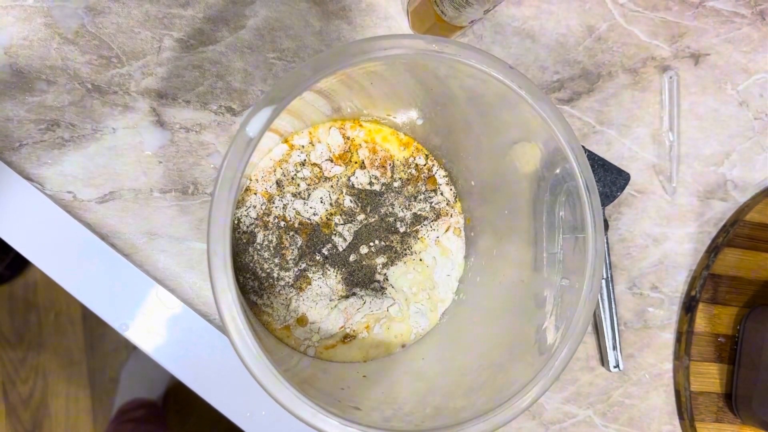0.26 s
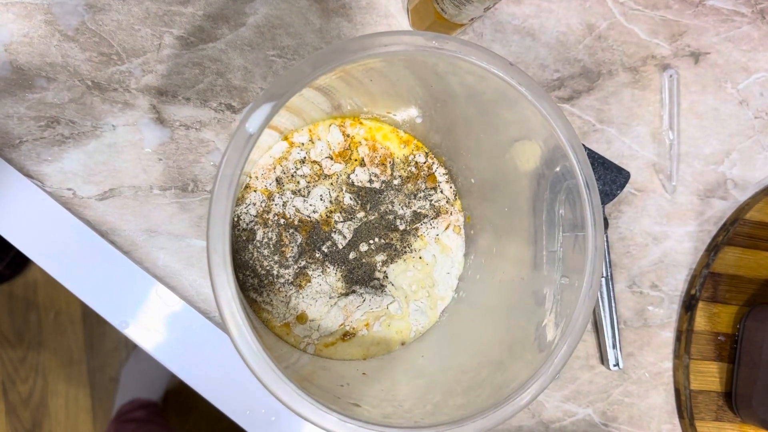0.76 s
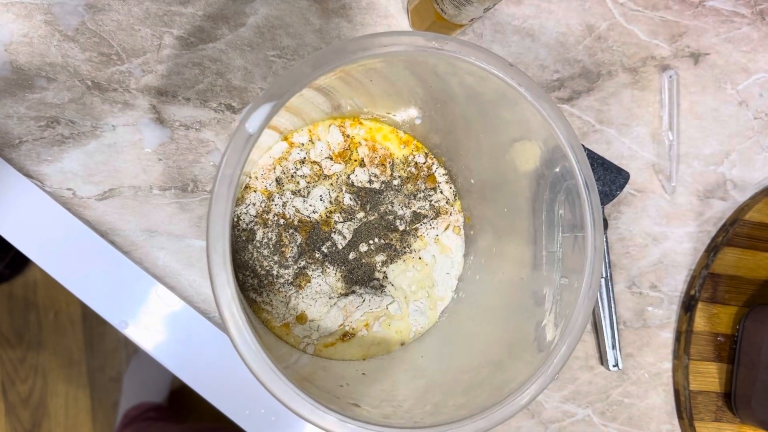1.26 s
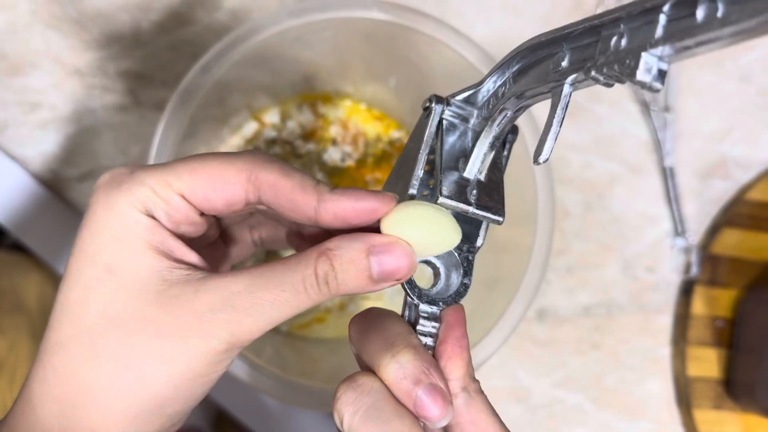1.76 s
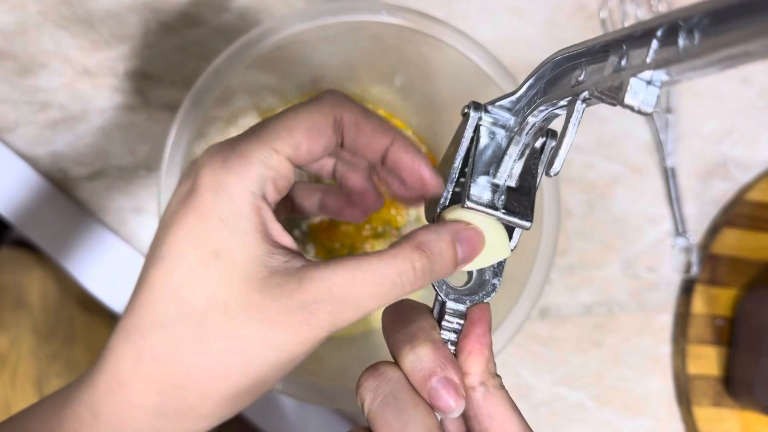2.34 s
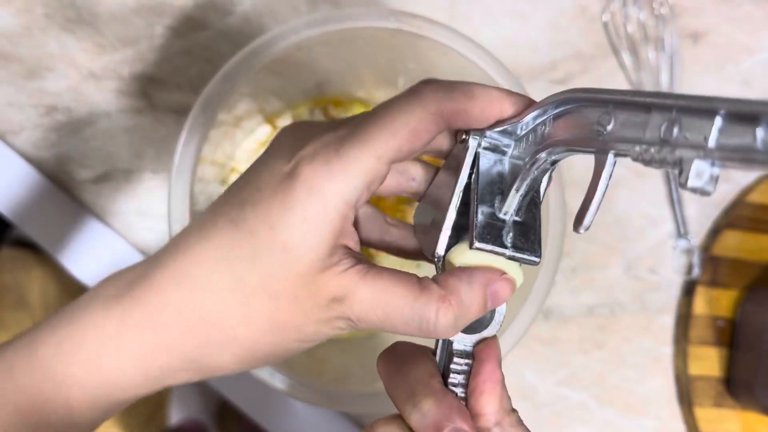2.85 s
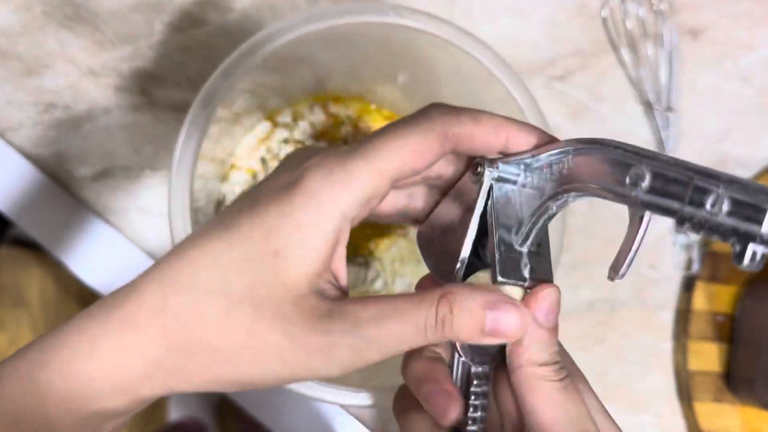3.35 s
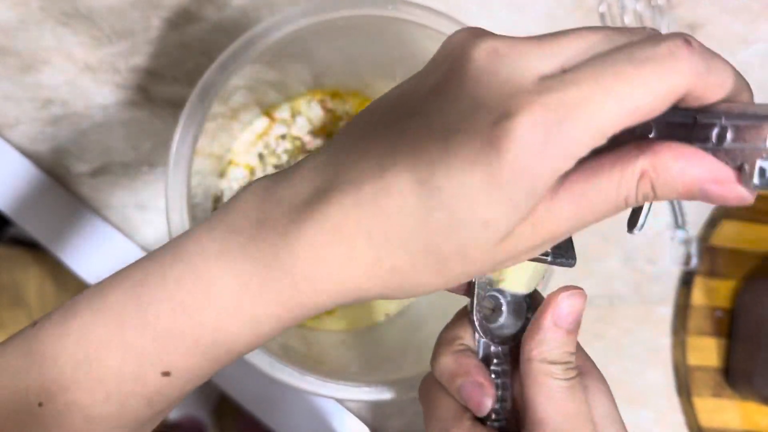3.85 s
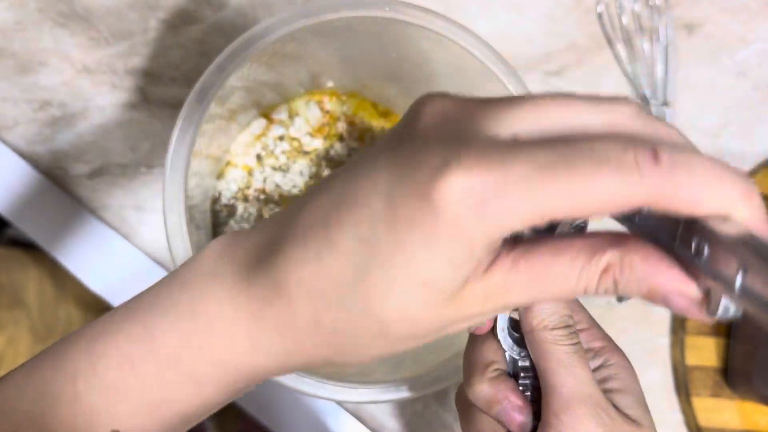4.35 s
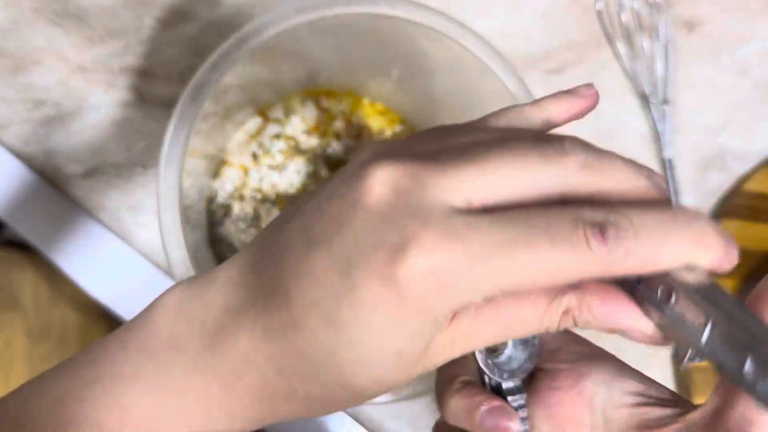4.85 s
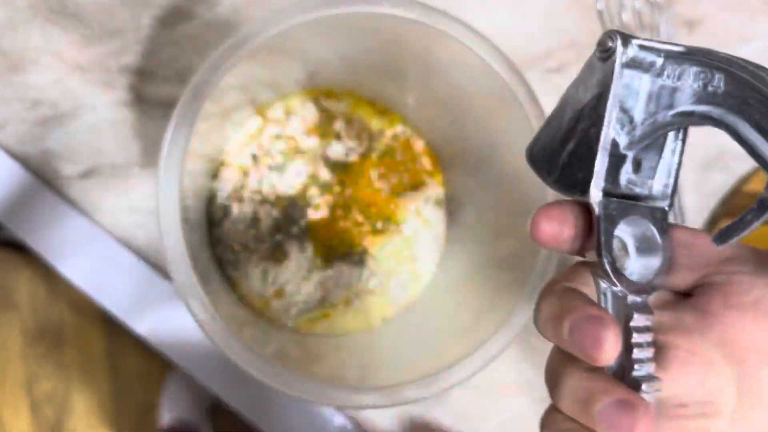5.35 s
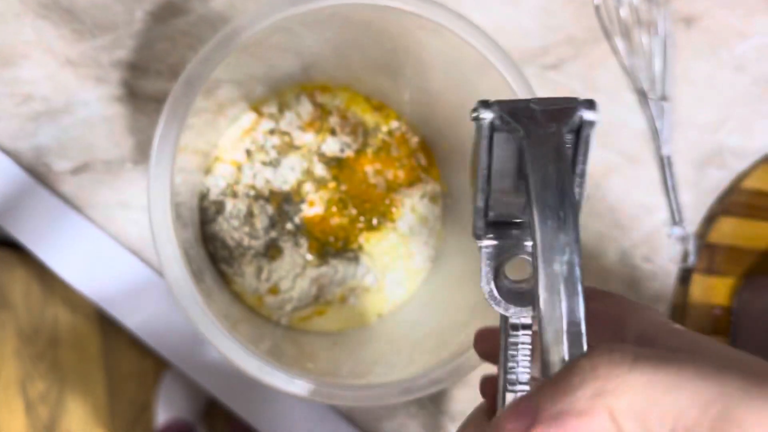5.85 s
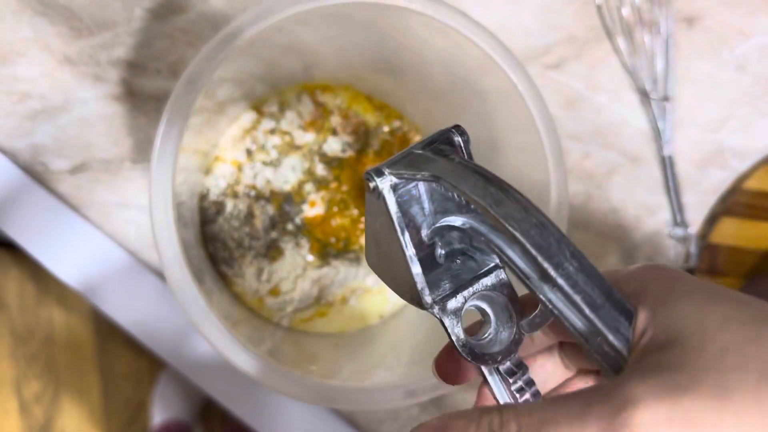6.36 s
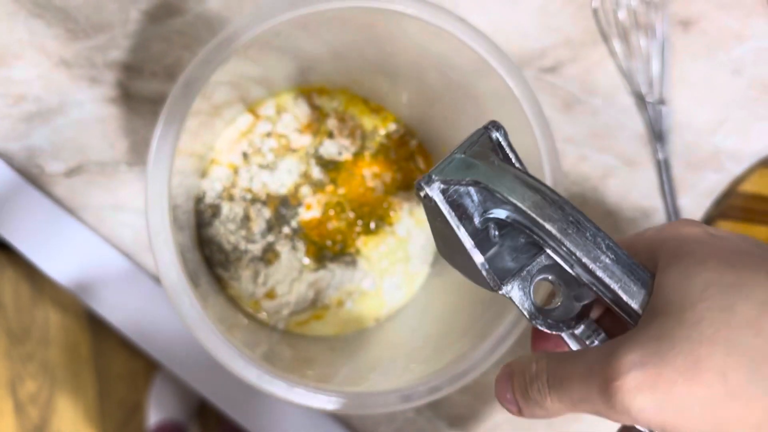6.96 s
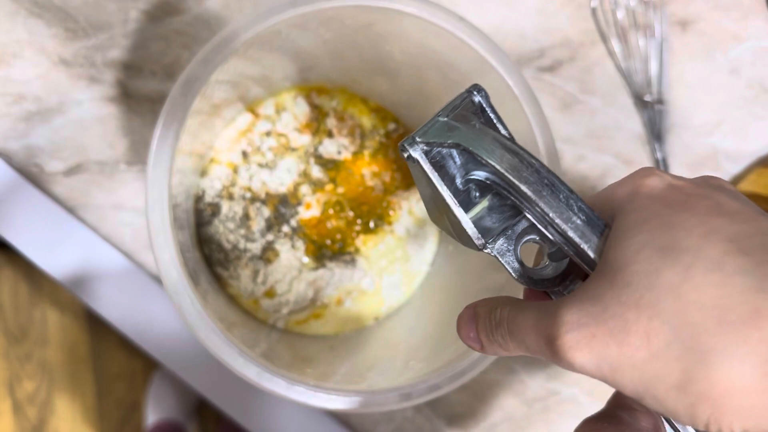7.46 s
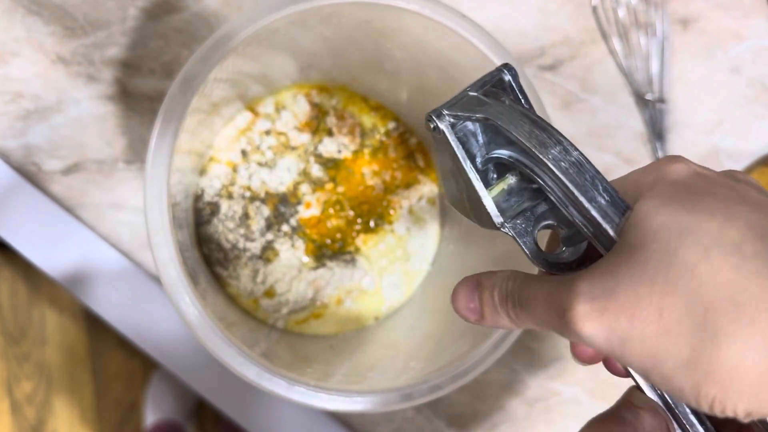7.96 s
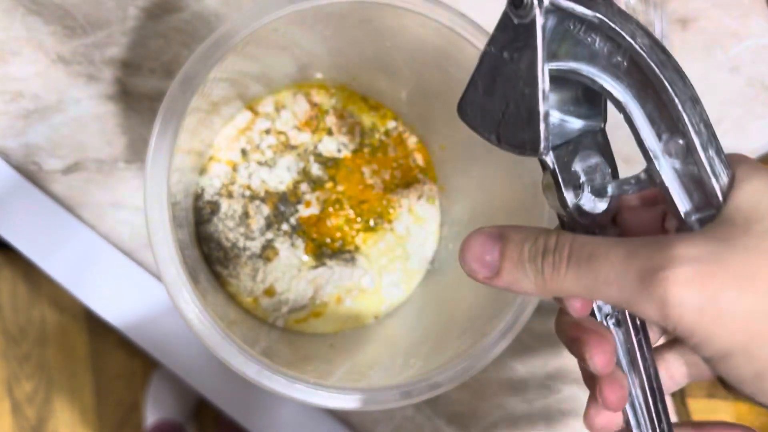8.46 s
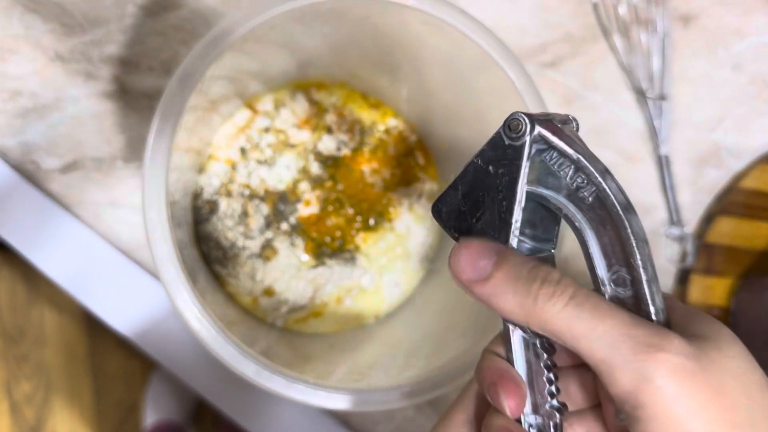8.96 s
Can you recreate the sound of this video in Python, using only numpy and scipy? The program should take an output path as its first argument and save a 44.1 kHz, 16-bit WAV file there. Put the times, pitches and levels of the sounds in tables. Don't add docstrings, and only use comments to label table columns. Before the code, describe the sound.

Close kitchen handling: hollow plastic knocks, near-silent finger touches, a sharp metal press slam, plunger knocks, then bright garlic-skin crackling over faint fridge hum.

```python
import sys
import numpy as np
from scipy import signal
from scipy.fft import rfft, irfft
from scipy.io import wavfile
from scipy.ndimage import uniform_filter1d

SR = 44100
rng = np.random.default_rng(int(sys.argv[2]) if len(sys.argv) > 2 else 0)


def voltage_ratio(level):
    return 10 ** (np.asarray(level, float) / 20)


def store_pcm(level_fs):
    pcm = np.round(np.clip(level_fs, -1, 1) * 32767).astype(np.int16)
    wavfile.write(sys.argv[1], SR, np.atleast_2d(pcm).T)


N = 406161
TIME = np.arange(N) / SR
CUT_S = 1.405
BOWL_NEAR = (TIME < CUT_S) | (TIME > 8)


def evened(x):
    return x / np.sqrt(np.mean(x ** 2) + 1e-20)


def read(points, hz):
    f, value = np.transpose(points)
    return np.interp(np.log(hz + 1), np.log(f + 1), value)


def add(mix, s, sound):
    part = mix[round(s * SR):][:len(sound)]
    part += sound[:len(part)]


def played(rows):
    s, *columns = np.transpose(rows)
    t = np.arange(max(s[0], 0), s[-1], 1 / SR)
    return t[0], [np.interp(t, s, c) for c in columns]


def resonate(x, hz, width):
    turn = np.exp(2j * np.pi * np.cumsum(hz * np.ones(len(x))) / SR)
    r = np.exp(-np.pi * width / SR)
    return 2 * (turn * signal.lfilter([1 - r], [1, -r], x / turn)).real


def band(x, lo_hz, hi_hz):
    sos = signal.butter(3, [lo_hz, min(hi_hz, SR / 2.2)], "band", fs=SR, output="sos")
    return evened(signal.sosfilt(sos, x))


def dipped(x, hz, width, share):
    b, a = signal.iirpeak(hz, hz / width, SR)
    return x - np.clip(share, 0, 1) * signal.lfilter(b, a, x)


def gritty(count, per_s, spread_db, share):
    hiss, chance, size = rng.standard_normal(count), rng.random(count), rng.exponential(1, count)
    slips = np.sign(hiss) * (chance < per_s / SR) * voltage_ratio(spread_db * np.minimum(size, 4))
    return hiss + share * evened(slips)


def body(x, peaks, widen):
    out = 0
    for hz, db, w in [(hz, db, w * widen) for hz, w, db in peaks]:
        out = out + voltage_ratio(db) * evened(resonate(resonate(x, hz, w), hz, 4 * w))
    return evened(out)


def blow(peak_db, hz, bass_db, treble_db, contact_ms, edges_hz, lift_db, tail_db, peaks, ring_db):
    t, f = np.arange(4096) / SR, np.fft.rfftfreq(8192, 1 / SR)
    u = 1000 * t / max(contact_ms, .2)
    contact = (1 - np.exp(-9 * u)) * np.exp(-.75 * u)
    tail = voltage_ratio(tail_db - 1.677 * u) * np.minimum(u, 1)
    drive = gritty(len(t), 2200, 3.0, 0.8) * (contact + tail)
    drive[4] += 8.0
    levels_db = [bass_db - 22.0, bass_db, 0, 0, treble_db, treble_db - 12.5]
    colour = voltage_ratio(read(list(zip(edges_hz, levels_db)), f))
    colour = colour + voltage_ratio(lift_db) / (1 + ((f - hz) / (0.14 * hz)) ** 2)
    folded = irfft(np.log(colour))[:4096] * np.append(1, np.full(4095, 2))
    crack = irfft(rfft(drive, 8192) * np.exp(rfft(folded, 8192)))
    crack = np.roll(crack, 44)
    ring = body(np.append(drive, 0 * t), peaks, 0.79)
    crack = crack + voltage_ratio(ring_db) * np.sqrt(np.mean(crack ** 2)) * ring
    crack = crack[:6000] * np.minimum(np.arange(6000, 0, -1) / 1000, 1)
    return voltage_ratio(peak_db) * crack / abs(crack).max()


def burst(peak_s, rise_s, peak_db, fall_db_per_s):
    start = max(peak_s - rise_s, 0)
    t = np.arange(start, peak_s + min(48 / fall_db_per_s, .5), 1 / SR) - peak_s
    climb_db = 33 * np.maximum(-t / rise_s, 0)
    return start, voltage_ratio(peak_db - climb_db - fall_db_per_s * np.maximum(t, 0))


def struck(modes, hits):
    out, t = np.zeros(N), np.arange(SR // 4) / SR
    ring = 0
    for k, (hz, db, t60) in enumerate(modes):
        ring = ring + (-1) ** k * voltage_ratio(db - 60 * t / t60) * np.sin(2 * np.pi * hz * t)
    for s, db in hits:
        add(out, s, voltage_ratio(db) * ring * np.minimum(t / 0.0011, 1))
    return out


# f/Hz, level/dB per Hz
AIR_SPECTRUM = [(20, -64), (70, -8), (420, -19), (600, -29.5), (1100, -34), (3800, -27.5), (7500, -41),
                (16000, -57)]


def room_air():
    hz = np.fft.rfftfreq(2048, 1 / SR)
    a, b, patches = rng.standard_normal((N // 512 + 6, len(hz), 3)).T
    patches = evened(uniform_filter1d(uniform_filter1d(patches, 20, 0), 8, 1))
    depth_db = (1.5 + 1.0 * (hz < 260))[:, None]
    gain = voltage_ratio(read(AIR_SPECTRUM, hz)[:, None] + depth_db * patches)
    air = signal.istft((a + 1j * b) * gain, nperseg=2048, noverlap=1536)[1][:N]
    return voltage_ratio(-68.5) * evened(air)


# f/Hz, level/dB, start phase/turns
FRIDGE_PARTIALS = [(76.0, -78, 0), (98.39, -72, 0), (99.97, -76, .1), (94.57, -85, 0), (141.9, -85, 0),
                   (304.89, -74, 0), (406.5, -76, 0), (508.15, -92, 0)]


def fridge():
    return sum(voltage_ratio(db + 3) * np.sin(2 * np.pi * (f * TIME + turns)) for f, db, turns in FRIDGE_PARTIALS)


def whine():
    hz, width_hz, pulses_per_s = 6104, 259, 63
    pulse = np.maximum(np.sin(2 * np.pi * pulses_per_s * TIME) + .2, 0)
    drive = (rng.standard_normal(N) + 1.5 * np.sin(2 * np.pi * hz * TIME)) * pulse
    tone = evened(resonate(resonate(drive, hz, width_hz), hz, width_hz))
    octave = evened(tone ** 2 - uniform_filter1d(tone ** 2, size=21))
    return voltage_ratio(-85) * (tone + voltage_ratio(-13) * octave)


# f/Hz, t60/s
ROOM_DECAY = [(300, 0.6), (1500, 0.44), (4000, 0.39), (12000, 0.31)]


def kitchen(x):
    taps = np.zeros(SR // 2)
    at = np.arange(200, len(taps) - 20, 20)
    taps[at + rng.integers(0, 20, len(at))] = rng.choice([-1., 1.], len(at))
    hz, t, z = signal.stft(taps, SR, nperseg=256)
    tail = signal.istft(z * voltage_ratio(-60 * t / read(ROOM_DECAY, hz)[:, None]), SR, nperseg=256)[1]
    return signal.fftconvolve(x, tail / np.linalg.norm(tail))[:N]


# f/Hz, level/dB, t60/s
SPOON_MODES = [(4663, -22, 0.89), (5300, -2.5, 0.18), (6580, -2.5, 0.22), (6334, -45, 5.06),
               (11610, -10, 0.17)]


def spoon():
    out = 0
    for hz, db, t60 in SPOON_MODES:
        out = out + voltage_ratio(-55.5 + db - 60 * TIME / t60) * np.sin(2 * np.pi * hz * TIME)
    return out


# t/s, f/Hz, level/dB
CREAK_GLIDE = [(7.97, 990, -94), (8.01, 853, -89), (8.05, 709, -75), (8.126, 648, -80), (8.14, 634, -82),
               (8.16, 620, -90)]


def creak():
    out = np.zeros(N)
    s, (hz, db) = played(CREAK_GLIDE)
    drive = rng.standard_normal(len(hz))
    tone = evened(resonate(resonate(drive, hz, 60), hz, 80))
    tone = tone + 1.47 * evened(resonate(resonate(drive, hz / 2, 30), hz / 2, 50))
    add(out, s, voltage_ratio(db + 10.5) * tone * signal.windows.tukey(len(hz), .2))
    return out


# t/s, length/s, level/dB, low f/Hz, high f/Hz
COUNTER_BUMPS = [(0, 0.049, -41.5, 60, 199), (0.943, 0.23, -46, 206, 616), (1.675, 0.073, -54.5, 98, 281),
                 (4.902, 0.38, -57, 125, 172), (6.208, 0.045, -41.5, 520, 1340),
                 (6.267, 0.098, -53.5, 252, 1300), (6.71, 0.24, -60, 258, 574),
                 (8.311, 0.16, -51, 201.7, 436), (8.365, 0.14, -50.5, 184, 412),
                 (8.777, 0.17, -67, 398, 784)]


def bumps():
    out, t = np.zeros(N), np.arange(SR // 3) / SR
    for s, length, db, lo_hz, hi_hz in COUNTER_BUMPS:
        u = 5 * t / length
        add(out, s, voltage_ratio(db) * band(rng.standard_normal(len(t)), lo_hz, hi_hz) * np.sqrt(u) * np.exp(-u))
    return out


# t/s, f/Hz, level/dB, t60/s
RINGING_PARTS = [(3.623, 1743, -41, 0.05), (3.623, 4280, -50, 0.071), (3.623, 10800, -61, 0.07),
                 (3.925, 11740, -68, 0.075), (3.965, 3080, -76, 0.44), (4.883, 1602, -43, 0.07),
                 (4.883, 10800, -43.5, 0.13), (4.883, 7900, -37, 0.092), (4.882, 3210, -28.5, 0.067),
                 (5.51, 1796, -58, 0.055), (6.037, 1593, -57.5, 0.13), (6.266, 1900, -26, 0.019),
                 (7.791, 11460, -34, 0.04), (8.359, 1650, -60.5, 0.084), (8.359, 4400, -60, 0.078),
                 (8.79, 3720, -70.5, 0.58), (8.8, 7060, -69, 0.46), (4.125, 3070, -71, 0.19),
                 (4.11, 4400, -72.5, 0.26), (5.088, 4500, -67, 0.11), (5.235, 2264, -72, .4),
                 (1.306, 2125, -67, 1.4), (.955, 1090, -46, 0.28), (1.328, 3470, -72.5, 2.5)]


def ringing():
    out, t = np.zeros(N), np.arange(SR // 3) / SR
    for s, hz, db, t60 in RINGING_PARTS:
        cluster = body(rng.standard_normal(len(t)), [(hz, 2.5 * np.sqrt(hz), 0)], 0.91)
        same_scene = (s + t < CUT_S) | (s > CUT_S)
        add(out, s, voltage_ratio(db + 3.0 - 60 * t / t60) * cluster * np.minimum(t / 0.00047, 1) * same_scene)
    return out


# t/s, f/Hz, level/dB, t60/s
FAINT_PINGS = [(.235, 7000, -67, 0.0086), (.332, 1025, -56.5, 0.17), (.366, 1010, -32, 0.084),
               (.372, 2980, -44, .03), (.465, 1200, -54, .06), (.51, 1050, -58, .08),
               (.96, 3700, -51, 0.18), (4.547, 5950, -51, 0.089), (6.055, 7900, -50, 0.043),
               (6.055, 2720, -51, .04), (6.055, 11000, -44, 0.056), (7.254, 11500, -36, .012),
               (7.276, 11300, -24.5, .012), (7.791, 11330, -15, 0.014), (7.415, 10700, -33.5, 0.032),
               (1.304, 5500, -62, .03), (3.623, 7070, -50, .04), (3.924, 8500, -51, .02),
               (3.925, 6100, -59, .04), (4.047, 3300, -51, .02), (4.408, 3660, -51, .03),
               (4.062, 2970, -45, 0.028), (7.253, 7200, -33, .012), (7.6143, 9500, -38, .01),
               (7.649, 1740, -44, 0.022), (7.666, 1780, -45, 0.018), (7.699, 1860, -41, 0.017),
               (7.716, 1770, -41, .02), (7.8385, 3570, -49, .012), (7.878, 3300, -49, 0.011),
               (7.964, 1206, -63.5, 0.025), (0, 529, -55, 0.15), (0, 758, -59, 0.33), (0, 2460, -56, .08),
               (.004, 435, -60, .25), (1.293, 2000, -60, .04), (1.995, 6090, -68.5, .15),
               (1.995, 10000, -83, .12), (2.19, 10050, -80, .06), (2.192, 6000, -68, .12),
               (2.191, 2710, -60, 0.031), (2.443, 10200, -76, .05), (6.222, 5350, -38, .07)]


def pings():
    return sum(struck([(hz, 0, t60)], [(s, db)]) for s, hz, db, t60 in FAINT_PINGS)


# f/Hz, width/Hz, level/dB
BOWL_PEAKS = [(520, 110, -5), (876, 262, 3.5), (1063, 56, -3.5), (1300, 365, -0.5), (1650, 263, 1),
              (2117, 96, -7.5), (2434, 120, -2.5), (3486, 300, -3), (4200, 51, -13.5)]
# t/s, peak level/dB, strongest f/Hz, treble level/dB, contact/ms
BOWL_KNOCKS = [
    (0.371, -31.5, 1060, 3, 2.8),
    (0.4018, -29.5, 1160, -5.5, 0.77),
    (0.7753, -31, 1144, -8, 0.55),
    (0.802, -41.5, 1120, 3.5, 2),
    (0.823, -39, 1180, -1.5, 1.66),
    (0.832, -40.5, 1250, -9.5, 1.6),
    (0.929, -41, 1800, 0.5, 1.5),
    (0.9449, -15, 1174, -7, 0.83),
]
# peak t/s, rise/s, peak level/dB, fall/dB per s, treble level/dB
BOWL_SLIDES = [
    (0.002, 0.0065, -50.5, 206, -12.5),
    (.372, 0.044, -39, 749.5, -8),
    (.404, 0.0028, -48.5, 232, -7.5),
    (0.776, 0.0022, -47, 137, -6),
    (0.933, 0.043, -47, 999.5, -36),
    (.952, 0.0044, -40.5, 155, -12),
    (1.295, 0.0086, -71, 97.5, -1),
    (1.36, 0.076, -54.5, 10, -30),
    (8.31, 0.016, -62, 114, -7),
    (9.2, 0.072, -67.5, 30, -10.5),
]


def bowl():
    out = np.zeros(N)
    edges_hz = [120, 400, 800, 2200, 4000, 10500]
    for s, db, hz, treble_db, ms in BOWL_KNOCKS:
        add(out, s - .001, blow(db, hz, -21, treble_db, ms, edges_hz, 7.0, -1.7, BOWL_PEAKS, -2.6))
    for *shape, treble_db in BOWL_SLIDES:
        s, gain = burst(*shape)
        drive = gritty(len(gain), 400, 1.3, 0.8)
        sound = 0.55 * body(drive, BOWL_PEAKS, 1.17) + 0.5 * band(drive, 560, 2020)
        sound += voltage_ratio(treble_db) * band(drive, 2270, 7680) + voltage_ratio(-23) * band(drive, 290, 340)
        add(out, s, gain * sound)
    return out * BOWL_NEAR


# f/Hz, level/dB, t60/s
WALL_MODES = [(660, -5, 0.04), (1005, -3.5, 0.034), (1163, 4, 0.026), (1666, -13, 0.04), (4200, -12, 0.036),
              (4640, -10.5, .015), (4974, -15.5, 0.019)]
# t/s, level/dB
WALL_TOUCHES = [(0.346, -53), (0.359, -45), (0.3699, -42), (.378, -42), (0.391, -53), (0.7764, -39.5),
                (.793, -44), (.802, -39), (0.8246, -37.5), (.833, -39.5), (.849, -46), (.864, -49.5)]


def bowl_wall():
    return struck(WALL_MODES, WALL_TOUCHES)


# f/Hz, level/dB, t60/s
LANDING_MODES = [(315.5, -11.5, 0.046), (910, -3.5, 0.035), (1196, 6.5, 0.016), (1450, 1, .012),
                 (2300, -9.5, 0.011), (3320, -13.5, 0.022), (6250, -11.5, 0.013)]
# t/s, level/dB
LANDING_TOUCH = [
    (0.9442, -25),
]


def bowl_landing():
    return struck(LANDING_MODES, LANDING_TOUCH)


# f/Hz, width/Hz, level/dB
SKIN_PEAKS = [(5125, 55, -9.5), (5980, 60, -7.5), (7060, 180, -9.5), (10880, 74, -8), (14000, 36, -17)]


def rustle(level, treble_db, bass_db):
    drive = gritty(len(level), 350, 2.4, 0.5)
    middle = 0.78 * band(drive, 3920, 7270) + 0.48 * body(drive, SKIN_PEAKS, 7.4)
    high = band(drive, 7570, 12600) + .5 * band(drive, 12600, 17000)
    return level * (middle + voltage_ratio(treble_db) * high + voltage_ratio(bass_db) * band(drive, 1300, 3300))


# t/s, length/s, level/dB, treble level/dB, bass level/dB
FINGER_STROKES = [(2.712, 0.157, -75.5, -7, -7), (2.922, 0.06, -73.5, -14, -18), (3.068, 0.3, -73, -4, -11),
                  (3.312, 0.16, -76, -13, -10.5), (3.521, 0.25, -73, -2, 0), (3.736, 0.14, -77, -8, -14.5),
                  (3.897, 0.12, -76.5, -14, -3.5), (4.032, 0.18, -73, -18, -7),
                  (4.309, 0.16, -71.5, -19, -4.5), (4.452, 0.22, -72.5, -5, -4.5),
                  (4.873, 0.052, -37.5, -8.5, -5), (5.052, 0.2, -68.5, -6, -8.5),
                  (5.165, 0.22, -73.5, -6, 2), (5.494, 0.13, -65.5, -2, -8), (5.599, .13, -73.5, -4, -10),
                  (5.744, 0.265, -68, -4.5, -0.5), (6.016, 0.08, -56, -6, -7.5),
                  (5.948, 0.14, -69, 1.5, -10), (8.042, 0.19, -71, -4.5, -6), (8.29, 0.18, -72, -2, -1),
                  (8.589, 0.17, -74, -1, -14), (8.736, 0.22, -67, -8, -2.5), (8.942, 0.31, -76.5, -2, -21)]
# t/s, level/dB
RUB_PRESSURE = [(6.1, -57.5), (6.236, -65.5), (6.5, -63.5), (6.62, -63.5), (6.71, -55), (6.8, -63),
                (6.92, -56.5), (7.02, -55.5), (7.1, -61), (7.3, -51)]
# t/s, level/dB
CRUMPLE_PRESSURE = [(7.27, -51.5), (7.32, -47.5), (7.364, -57), (7.43, -53.5), (7.5, -65.5), (7.6, -54),
                    (7.72, -54), (7.88, -65.5), (8.02, -84.5)]


def skin_rubbed():
    out = np.zeros(N)
    for s, length, db, treble_db, bass_db in FINGER_STROKES:
        add(out, s, rustle(voltage_ratio(db) * np.hanning(round(length * SR)), treble_db, bass_db))
    for rows, treble_db, bass_db in [(RUB_PRESSURE, -5, -16.5), (CRUMPLE_PRESSURE, 2.8, -10.5)]:
        s, (pressure_db,) = played(rows)
        level = voltage_ratio(pressure_db) * signal.windows.tukey(len(pressure_db), .05)
        add(out, s, rustle(level, treble_db, bass_db))
    return out


# f/Hz, level/dB, t60/s
CREASE_MODES = [(4080, -4.5, 0.015), (5160, -1, 0.013), (6100, 3, .008)]
# t/s, level/dB
CREASE_TOUCHES = [(6.93, -48), (6.95, -47), (6.9893, -45), (7.011, -46), (7.026, -41), (7.052, -44),
                  (7.063, -43), (7.075, -45), (7.09, -52), (7.112, -43), (7.176, -51)]


def skin_creased():
    return struck(CREASE_MODES, CREASE_TOUCHES)


# t/s, level/dB, f/Hz of the flap
TEAR_GLIDE = [(7.318, -35, 6400), (7.354, -35.5, 6200), (7.368, -38, 6100), (7.418, -37, 5100),
              (7.45, -37.5, 5625), (7.482, -40.5, 4400), (7.528, -45.5, 3850)]


def skin_torn():
    out = np.zeros(N)
    s, (tear_db, hz) = played(TEAR_GLIDE)
    drive = gritty(len(hz), 1800, 2.5, .7)
    flap = evened(resonate(resonate(drive, hz, 800), hz, 1000))
    flap = flap + 0.45 * evened(resonate(resonate(drive, 2.73 * hz, 2500), 1.9 * hz, 2607))
    hollows = [(4100, 500, -3), (8300, 500, -2), (2700, 400, -11), (15000, 1500, -8)]  # f/Hz, width/Hz, level/dB
    flap += .5 * body(drive, hollows, 1.0)
    flutter_db = 1.5 * evened(uniform_filter1d(drive, size=200))
    sound = band(flap, 2500, 15500) + 0.43 * band(drive, 3350, 7400)
    add(out, s, voltage_ratio(tear_db + flutter_db + 1.0) * sound * signal.windows.tukey(len(hz), .1))
    return out


# t/s, peak level/dB, strongest f/Hz, bass level/dB, treble level/dB
JAW_CLACKS = [(3.626, -37, 6900, -4, -15), (4.8826, -12, 4360, -12, -16.5), (4.8852, -11, 4070, -16.5, -17),
              (5.1302, -31.5, 3800, -7, -14), (5.511, -24, 6100, -19, -13),
              (6.032, -35, 10920, 12.5, -12.5), (6.211, -11, 5200, 1.5, -6), (6.2133, -15, 6640, -10, -7),
              (6.2671, -14.5, 6000, 15, -14), (6.716, -20.5, 5340, -32.5, -4.5), (8.3582, -40, 6940, 4, -4)]
# t/s, peak level/dB, strongest
# f/Hz
DULL_TICKS = [(4.0613, -51, 2920), (4.361, -45, 3500), (4.371, -49.5, 3130), (4.4085, -47, 3680),
              (4.842, -41, 3160), (4.873, -32.5, 3076), (7.8194, -45, 3170), (7.864, -49, 3240)]
# t/s, peak level/dB, strongest f/Hz, treble level/dB
FINGER_TICKS = [(2.1919, -59, 6250, -26), (2.751, -51, 6010, 9.5), (3.13, -49.5, 3520, 9.5),
                (3.3512, -47, 4250, -2.5), (3.9238, -42, 5900, -11), (4.539, -46, 2900, -10),
                (4.56, -45.5, 2900, -8), (4.574, -44, 4500, -4), (4.9828, -42, 4220, -9),
                (6.4662, -41, 10800, -11), (8.1215, -50.5, 3420, -20.5), (8.9989, -55, 6100, -10),
                (9.1464, -52, 5860, -1)]
# t/s, peak level/dB, strongest f/Hz, treble level/dB
SKIN_SNAPS = [(7.0385, -23, 6800, 3), (7.1489, -17.5, 6650, 0.5), (7.1826, -36.5, 5780, -22),
              (7.227, -10.5, 6900, 7.5), (7.253, -24.5, 7170, -13), (7.268, -23, 6560, 3.5),
              (7.2749, -14.5, 7100, -1.5), (7.2835, -16.5, 5300, -8), (7.4137, -19.5, 4770, 0),
              (7.534, -31, 8300, -2), (7.5566, -26, 11700, -7), (7.5823, -30, 9900, -10.5),
              (7.7323, -30.5, 3350, -7.5), (7.7656, -24, 11350, 16.5), (7.7905, -15.5, 11000, 4.5),
              (7.798, -37.5, 3610, -1)]
# t/s, peak level/dB, strongest f/Hz, treble level/dB
CLOVE_POPS = [(7.276, -21, 7280, -14), (7.3032, -23.5, 5000, -31), (7.31, -33, 2270, -21),
              (7.6, -32, 6500, -5.5), (7.6163, -31.5, 8650, -3), (7.648, -30, 3240, -23),
              (7.6665, -33.5, 3293, -10), (7.7044, -25, 5730, -1.5), (7.7164, -27.5, 3300, -4)]


def clicks():
    out = np.zeros(N)
    rows = [(*row, 1.1) for row in JAW_CLACKS]
    rows += [(*row, -19.5, -40.5, 3.8) for row in DULL_TICKS]
    for group, bass_db, contact_ms in [(FINGER_TICKS, -1.5, 1.3), (SKIN_SNAPS, -18.5, 1.46), (CLOVE_POPS, -6.5, 1.45)]:
        rows += [(s, db, hz, bass_db, treble_db, contact_ms) for s, db, hz, treble_db in group]
    for s, db, hz, bass_db, treble_db, ms in rows:
        knee_hz = 3000 + 120 * max(-25 - bass_db, 0)
        edges_hz = [600, 1600, knee_hz, 7000, 11000, 16000]
        add(out, s - .001, blow(db, hz, bass_db, treble_db, ms, edges_hz, 8.1, -7.5, SKIN_PEAKS, -41.5))
    return out


# f/Hz, width/Hz, level/dB
PRESS_PEAKS = [(2930, 140, -9.5), (4230, 45, -17.5), (4400, 72, -17.5), (6130, 54, -2.5), (7900, 76, -7),
               (10000, 60, -7), (10800, 70, -2), (11800, 66, -33), (12835, 64, -25)]
# peak t/s, rise/s, peak level/dB, fall/dB per s
PRESS_RATTLES = [(2.754, 0.025, -73.5, 1200), (2.808, 0.066, -85, 302), (3.21, 0.23, -85, 802),
                 (3.278, 0.047, -83, 400), (4.575, 0.1, -62.5, 900), (5.086, 0.076, -72.5, 1499),
                 (5.164, 0.072, -69.5, 529.5), (6.04, .01, -52.5, 549)]


def rattles():
    out = np.zeros(N)
    for row in PRESS_RATTLES:
        s, gain = burst(*row)
        add(out, s, voltage_ratio(7.0) * gain * body(gritty(len(gain), 150, 1.1, 0.9), PRESS_PEAKS, 1.3))
    return out


# f/Hz, width/Hz, level/dB
HINGE_PEAKS = [(2500, 41, -3), (4220, 45, -2), (4860, 27, -4), (5400, 40, -5)]
# t/s, length/s, level/dB
HINGE_SQUEAKS = [
    (3.091, 0.06, -76),
    (3.136, 0.16, -69),
]


def squeaks():
    out = np.zeros(N)
    for s, length, db in HINGE_SQUEAKS:
        count = round(length * SR)
        add(out, s, voltage_ratio(db) * body(gritty(count, 240, 3.6, 0.84), HINGE_PEAKS, 0.6) * np.hanning(count))
    return out


# f/Hz, level/dB, t60/s
PIN_MODES = [(2890, -4, 0.049), (4290, -8.5, 0.055), (5950, -1, 0.082), (7900, -15, .05), (9900, -9, .06),
             (10800, -13, 0.071), (12460, -21, 0.044)]
# t/s, level/dB
PIN_TOUCHES = [(4.483, -67), (4.496, -62), (4.51, -62), (4.54, -54), (4.552, -56), (4.56, -53),
               (4.574, -54.5)]


def hinge_pin():
    return struck(PIN_MODES, PIN_TOUCHES)


# f/Hz, level/dB, t60/s
STOP_MODES = [(1607, -7, 0.027), (3106, -1, 0.021), (3780, -5.5, 0.025), (4250, 0, 0.028),
              (4670, -6, 0.029), (4900, -7, .05), (5420, -6, .04), (6270, -13, 0.034), (6400, -13, .05),
              (6770, -13, .03), (7790, -10, .015), (3450, -10, .05), (5800, -12.5, 0.024),
              (11210, -9, 0.017)]
# t/s, level/dB
STOP_TOUCHES = [
    (4.8828, -25),
    (4.884, -25.5),
    (4.8851, -20.5),
    (4.888, -28),
    (4.898, -33),
    (4.911, -35.5),
]
# f/Hz, level/dB, t60/s
FRAME_MODES = [(2929, -1.5, 0.077), (3284, -7.5, .27), (3779, -8, .14), (4300, -18, .4),
               (4931, -2.5, 0.077), (5426, -6, .18), (5615, -5.5, .12), (6013, -8.5, 0.18), (6616, -7, .12),
               (7000, -12.5, .2)]
# t/s, level/dB
FRAME_TOUCH = [
    (4.886, -34.5),
]


def slam():
    return struck(STOP_MODES, STOP_TOUCHES) + struck(FRAME_MODES, FRAME_TOUCH)


# f/Hz, level/dB, t60/s
CUP_MODES = [(1326, -9, .015), (2460, -5.5, 0.016), (3300, -6.5, .012), (4050, 11.5, 0.0081),
             (5360, -9.5, 0.018), (6660, -5.5, 0.018), (7230, -14.5, 0.016), (10540, -8, 0.016)]
# t/s, level/dB
CUP_TOUCHES = [
    (6.211, -23.5),
    (6.2144, -21),
]
# f/Hz, level/dB, t60/s
PLUNGER_MODES = [(1540, -1, 0.004), (2117, -5, 0.016), (3664, 5, 0.0095), (4500, 4, 0.0088),
                 (5860, -4.5, .008), (6600, 5.5, 0.0067), (8030, -10, .012), (11100, -10, .01)]
# t/s, level/dB
PLUNGER_TOUCH = [
    (6.2668, -22),
]


def plunger():
    return struck(CUP_MODES, CUP_TOUCHES) + struck(PLUNGER_MODES, PLUNGER_TOUCH)


def scene():
    press_dip = dict(hz=3000, width=270, share=0.51)
    first = dipped(bowl() + bowl_wall(), hz=2500, width=222.4, share=0.48)
    first = np.where(TIME < .25, dipped(first, hz=1030, width=400, share=0.87), first)
    second = dipped(clicks() + rattles() + squeaks(), **press_dip)
    metal = plunger() + slam() + hinge_pin()
    wet = voltage_ratio(-14.5) * (kitchen(first) * BOWL_NEAR + kitchen(second + voltage_ratio(-3.0) * metal))
    near = ringing() + bumps() + pings() + bowl_landing()
    near += dipped(skin_rubbed() + skin_torn(), **press_dip) + skin_creased()
    far = spoon() + creak() + room_air() + fridge() + whine()
    return (first + second + metal + wet + near + far)[None]


def low_pass(x):
    return signal.sosfilt(signal.butter(12, 16670, fs=SR, output="sos"), x)


def record(dry):
    cut = signal.sosfilt(signal.butter(2, 45, "high", fs=SR, output="sos"), dry)
    cut = signal.sosfilt(signal.cheby2(16, 50, 16260, fs=SR, output="sos"), cut)
    return low_pass(cut)


dry = scene()
out = record(dry)
store_pcm(out)
```